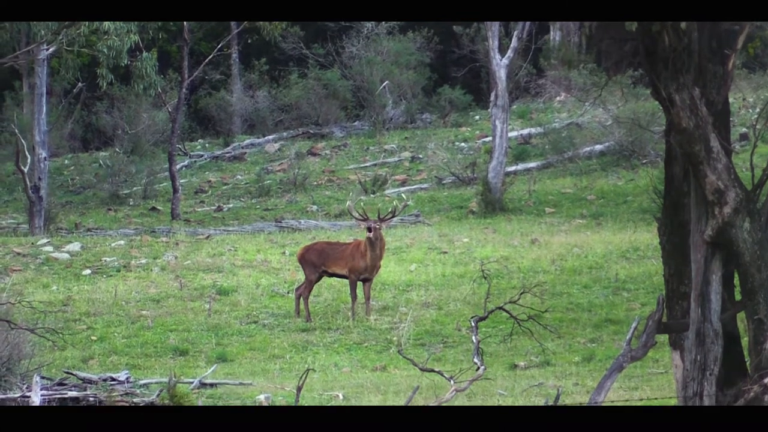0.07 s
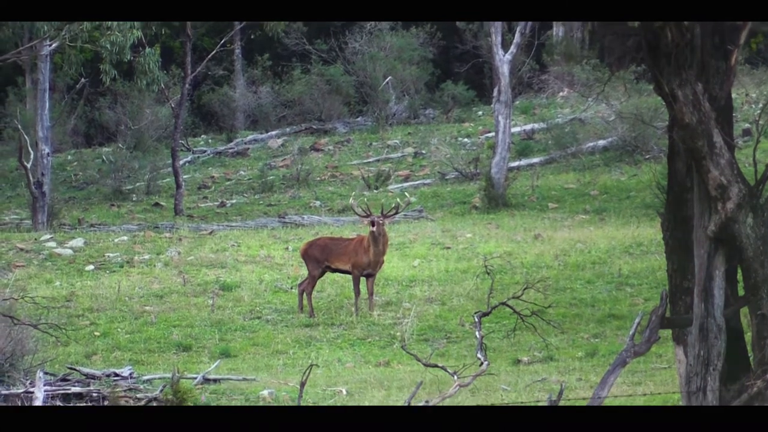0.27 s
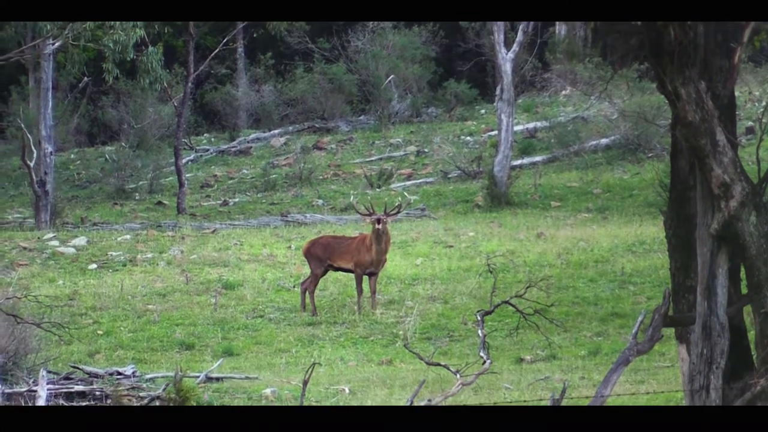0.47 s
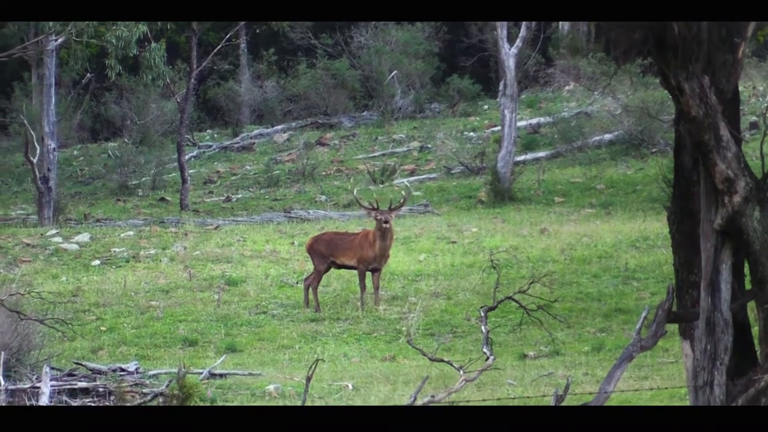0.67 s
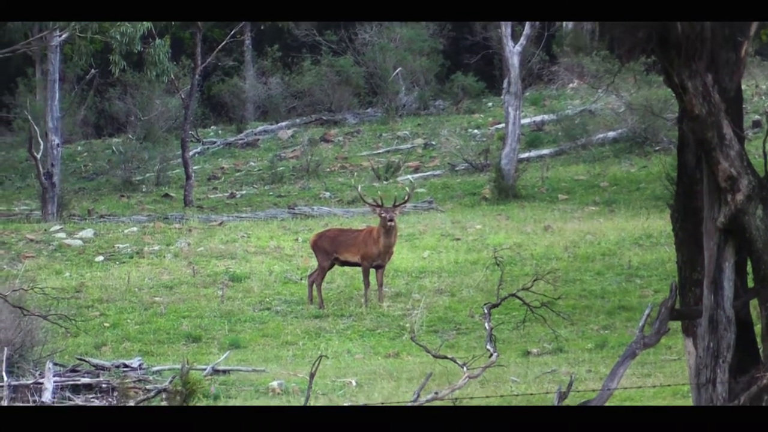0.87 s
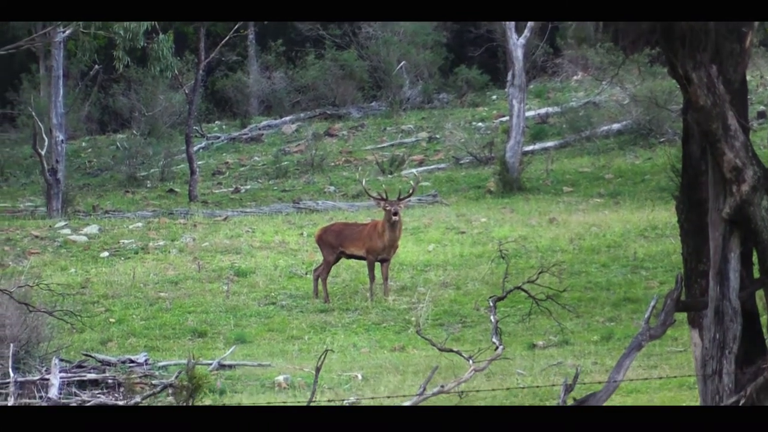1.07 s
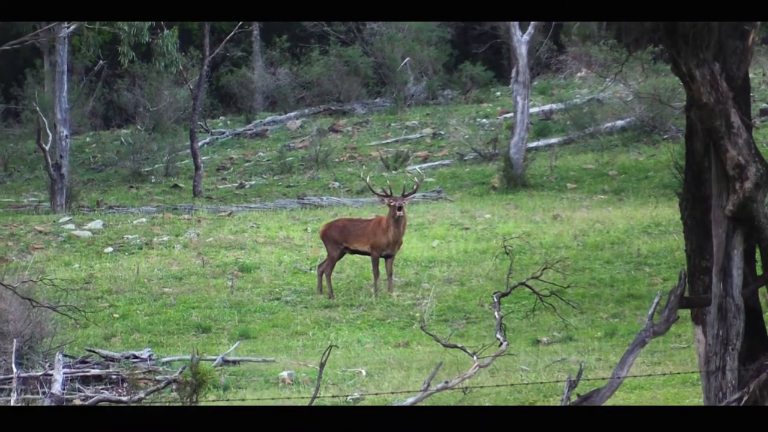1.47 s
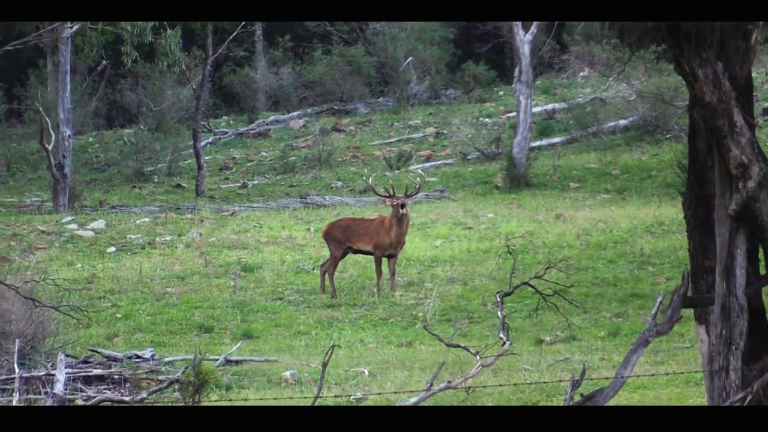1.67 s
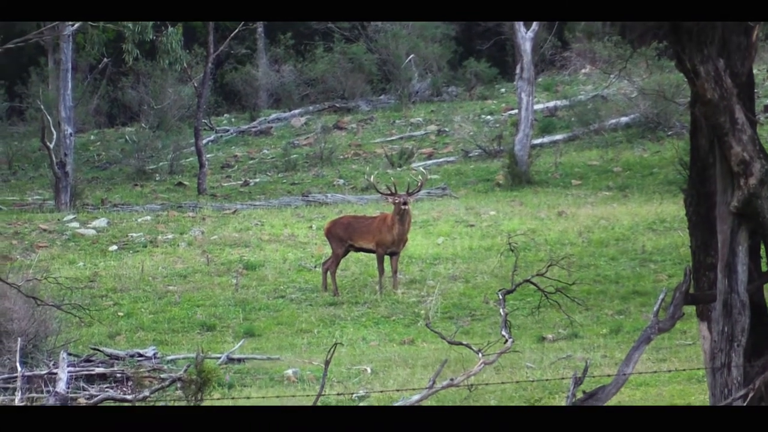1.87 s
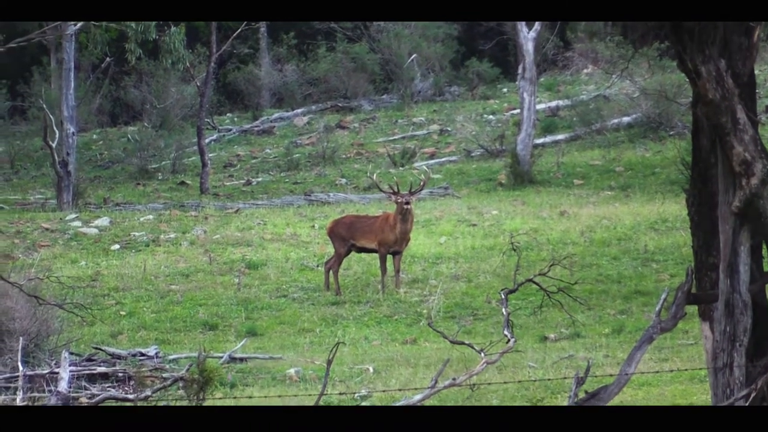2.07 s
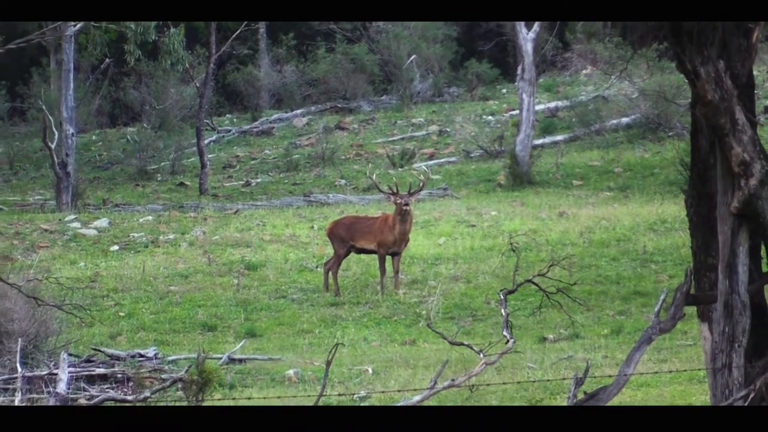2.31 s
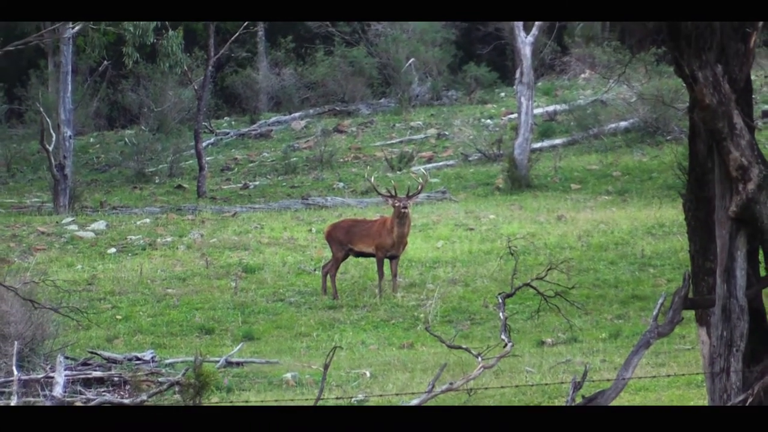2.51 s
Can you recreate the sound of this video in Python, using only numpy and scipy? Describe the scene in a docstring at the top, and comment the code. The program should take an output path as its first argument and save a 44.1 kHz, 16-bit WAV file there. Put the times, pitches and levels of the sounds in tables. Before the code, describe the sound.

A male deer roars twice, loud and harsh, over quiet forest background noise.

```python
"""A red stag roars in a clearing

Each of his two roars climbs from a low rattle to a held, buzzing note, then breaks into harsh,
uneven slaps of the vocal folds, all ringing through the changing shape of his throat.
A faint hiss goes with each roar, and the trees send back a short echo.
Small birds chirp over the soft rush of the forest."""
import sys
import numpy as np
from scipy import signal
from scipy.fft import rfft, irfft, next_fast_len
from scipy.io import wavfile
from scipy.ndimage import uniform_filter1d

SR = 44100
rng = np.random.default_rng(int(sys.argv[2]) if len(sys.argv) > 2 else 0)


def bounce(signal):
    """Save signal as a 16-bit WAV file at the path given by the first command-line argument."""
    frames = np.transpose(np.atleast_2d(signal))
    limited = np.clip(frames, -1, 1)
    pcm = np.round(limited * 32767).astype(np.int16)
    wavfile.write(sys.argv[1], SR, pcm)


N = 116865


def amp(db):
    """Turn decibels into a number to multiply by."""
    return 10 ** (np.asarray(db) / 20)


def unit(x):
    """Scale a signal to an average strength (rms) of 1."""
    return x / np.sqrt(np.mean(x ** 2) + 1e-20)


def level_at(points, hz):
    """Read the level at hz from (frequency, level) points joined on a log frequency axis."""
    point_hz, level_db = np.transpose(points)
    return np.interp(np.log(hz + 1), np.log(point_hz + 1), level_db)


def clock():
    """The time of each sample in seconds."""
    return np.arange(N) / SR


def curves(rows):
    """Join rows of (time, values...) with straight lines, giving one curve per value column."""
    time_s, *columns = np.transpose(rows)
    return [np.interp(clock(), time_s, column) for column in columns]


def window(start_s, end_s, fade_s):
    """1 between two times and 0 outside, with straight fades."""
    return np.clip(np.minimum(clock() - start_s, end_s - clock()) / fade_s + .5, 0, 1)


def wobble(samples=1000):
    """A random curve of strength 1 that changes over about this many samples."""
    return unit(uniform_filter1d(rng.standard_normal(N), samples))


def filtered(x, gain, causal=False):
    """Scale each frequency by gain(hz); a causal filter rings only after the sound goes in."""
    size = 2 * next_fast_len(N // 2 + 2048, True)
    response = gain(np.fft.rfftfreq(size, 1 / SR))
    if causal:  # same gains, with the least possible delay (minimum phase)
        cepstrum = irfft(np.log(response + 1e-9))
        response = np.exp(rfft(2 * cepstrum[:size // 2], size) - cepstrum[0])
    return irfft(rfft(x, size) * response, size)[:N]


def noise(spectrum):
    """Noise of strength 1, with its balance of bass and treble set by spectrum."""
    return unit(filtered(rng.standard_normal(N), lambda hz: amp(level_at(spectrum, hz))))


def steady(x, samples=1800):
    """Even out slow changes of loudness while keeping the single pulses."""
    power = uniform_filter1d(uniform_filter1d(x ** 2, samples), samples)
    return x / np.sqrt(np.abs(power) + 1e-4 * np.mean(x ** 2))


def pulses(times_s, sizes):
    """Sharp clicks, each spread over 16 samples so that it can fall between two of them."""
    centres = np.asarray(times_s)[:, None] * SR
    taps = np.floor(centres).astype(int) + np.arange(-7, 9)
    shape = np.sinc(taps - centres) * np.cos((taps - centres) * np.pi / 16) ** 2
    clicks = shape * sizes[:, None]
    return np.bincount(np.clip(taps, 0, N).ravel(), clicks.ravel(), N + 1)[:N]


def reflections(samples, fade_s):
    """Many tiny echoes: noise that dies away by 60 dB in fade_s."""
    t = np.arange(samples) / SR
    tail = rng.standard_normal(samples) * np.exp(-np.log(1000) * t / fade_s)
    return tail / np.linalg.norm(tail)


def echo(x, fade_s):
    """The sound as it bounces back from the ground and the trees."""
    return signal.fftconvolve(x, reflections(SR // 2, fade_s))[:N]


def scatter(x):
    """Reflections from the nearby slope smear each pulse in time without changing its tone."""
    path = amp(-2) * reflections(SR // 4, fade_s=0.093)
    path[0] += 1  # the sound that arrives directly
    size = 2 * next_fast_len(N)
    phase = np.angle(rfft(path, size))
    return irfft(rfft(x, size) * np.exp(1j * phase), size)[:N]


def forest():
    """The soft, steady rush of the forest."""
    # Tone of the rush: frequency_hz, relative_level_db
    rush_spectrum = [(20, -37), (110, -22), (250, -13.5), (331, -9), (480, -1), (582, -4.5), (1050, -7.5),
                     (1900, -12), (7500, -27.5), (15500, -30)]
    return amp(-42.5) * noise(rush_spectrum)


def birds(waver_hz=130):
    """Short, wavering whistles from the forest edge, most sliding up or down, and their echo."""
    # One chirp a row: start_s, length_s, from_hz, to_hz, level_db
    chirps = [(0.224, 0.043, 5210, 7000, -45), (0.234, 0.036, 3100, 3420, -41),
              (0.264, 0.044, 4780, 4780, -48), (1.48, 0.058, 3565, 4150, -50.5),
              (2.283, 0.047, 5050, 6465, -47), (2.314, 0.033, 4780, 4420, -46)]
    song = np.zeros(N)
    waver = waver_hz * wobble(samples=60)
    for start_s, length_s, from_hz, to_hz, level_db in chirps:
        progress = np.clip((clock() - start_s) / length_s, 0, 1)
        pitch_hz = from_hz + (to_hz - from_hz) * progress + waver
        whistle = np.sin(2 * np.pi * np.cumsum(pitch_hz) / SR)
        song += amp(level_db) * np.sin(np.pi * progress) * whistle
    return song + amp(2) * echo(song, fade_s=0.26)


def hiss():
    """A broad, faint hiss that goes with each roar."""
    # When the stag roars: start_s, end_s
    roar_times = [(0.154, 1.08), (1.587, 2.405)]
    # Tone of the hiss: frequency_hz, relative_level_db
    hiss_spectrum = [(120, -8), (500, 16.5), (3500, 2.5), (13000, -11)]
    roaring = sum(window(start_s, end_s, fade_s=0.029) for start_s, end_s in roar_times)
    return amp(-42) * noise(hiss_spectrum) * roaring


def vocal_folds(pitch_points, roughness_points, broken_hz, cycles=900):
    """Each flap of the folds makes a pulse and a puff of air; roughness makes the flaps uneven."""
    # Hard slaps of the folds as the roars die: time_s, level_db (above a smooth pulse)
    slaps = [(.6743, 6), (.7287, 6), (.9402, 6), (.9736, 7), (2.0882, 6), (2.1232, 6), (2.1356, 9),
             (2.1965, 8), (2.2234, 7), (2.2703, 12), (2.2913, 9), (2.3791, 8)]
    jitter_cycles, size_spread_db, air_share = 0.2964, 3.5, 0.51  # at full roughness
    sag_s, puff_decay_s, tremble_share = 0.1, 0.0026, 0.0015
    t = clock()
    pitch_hz = curves(pitch_points)[0]
    roughness = np.clip(curves(roughness_points)[0], 0, 1)
    # After its last pitch point the voice breaks and sags towards broken_hz.
    since_break_s = np.maximum(t - pitch_points[-1][0], 0)
    pitch_hz = broken_hz + (pitch_hz - broken_hz) * np.exp(-since_break_s / sag_s)
    pitch_hz *= 1 + tremble_share * wobble()
    # One flap per cycle; spare cycles land past the end of the sound.
    flap_s = np.interp(np.arange(cycles), np.cumsum(pitch_hz) / SR, t, right=2 * N / SR)
    flap_roughness = np.interp(flap_s, t, roughness)
    timing_luck, size_luck = rng.standard_normal((cycles, 2)).T
    flap_s += jitter_cycles * flap_roughness * timing_luck / np.interp(flap_s, t, pitch_hz)
    flap_db = size_spread_db * flap_roughness * (np.minimum(size_luck, 1.5) + 0.5)
    buzz = pulses(flap_s, amp(flap_db))
    for time_s, level_db in slaps:
        buzz += pulses([time_s], amp([level_db]))
    # Swirling air adds a quickly fading puff of noise after each pulse.
    decay = np.exp(-1 / (puff_decay_s * SR))
    puffs = np.sqrt(np.abs(signal.lfilter([1 - decay], [1, -decay], buzz ** 2)))
    return buzz + air_share * np.sqrt(roughness) * puffs * rng.standard_normal(N)


def throat(buzz, resonances, low_cut_hz=336):
    """The throat rings at a few frequencies, its resonances; the mouth lets little bass out."""
    # What the throat's tissue passes between the resonances: frequency_hz, level_db
    tissue = [(100, -33), (300, -30), (1000, -43), (3200, -32), (3800, -27.5), (5000, -49), (7000, -42),
              (12000, -71)]

    def gain(hz):
        peak_power = sum(amp(2 * level_db) / (1 + (1.796 * (hz - centre_hz) / width_hz) ** 2) ** 2
                         for centre_hz, width_hz, level_db in resonances)
        tissue_power = amp(2 * level_at(tissue, hz))
        bass_cut = 1 + (low_cut_hz / (hz + 20)) ** 6
        return np.sqrt((peak_power + tissue_power) / bass_cut)
    return filtered(buzz, gain, causal=True)


def roar(buzz, shapes, timing, loudness, steps=5):
    """The buzz rings through one throat shape after another; its lows and highs swell and fade."""
    blend_s, split_hz, flutter_db = 0.032, 1480, 0.4
    first_s, last_s = loudness[0][0], loudness[-1][0]
    ends_s = [start_s for start_s, _ in timing[1:]] + [last_s + blend_s]
    voice = np.zeros(N)
    for resonances, (start_s, sink_share), end_s in zip(shapes, timing, ends_s):
        # As the neck stretches the resonances sink in small steps, the highest ones most.
        edges_s = np.linspace(start_s, end_s, steps + 1)
        shifts = np.linspace(sink_share / 2, -sink_share / 2, steps)
        for from_s, to_s, shift in zip(edges_s, edges_s[1:], shifts):
            moved = [(hz * (1 + shift * (hz / 3000) ** 3), width, db) for hz, width, db in resonances]
            voice += throat(buzz * window(from_s, to_s, blend_s), moved)
    voice = scatter(voice)
    lows = filtered(voice, lambda hz: 1 / (1 + (hz / split_hz) ** 24))
    highs = voice - lows
    shaped = sum(steady(band) * amp(level_db + flutter_db * wobble())
                 for band, level_db in zip([lows, highs], curves(loudness)))
    return shaped * window(first_s, last_s, fade_s=0.03)


def stag():
    """The vocal folds drive the throat in two roars, which echo among the trees."""
    # How fast the folds flap in roars 1 and 2: time_s, pitch_hz
    pitch_1 = [(.15, 106.2), (.206, 131.2), (.286, 159), (.358, 175.6), (.406, 191.8), (.43, 193.5),
               (.468, 220.2), (.504, 215.2), (.64, 208.7)]
    pitch_2 = [(1.6, 112), (1.66, 136), (1.712, 149.6), (1.762, 156.8), (1.848, 160.6), (1.98, 154.9),
               (2.03, 162.3)]
    # How unevenly they flap: time_s, roughness (0 to 1)
    roughness_1 = [(.15, .1), (.29, .01), (.419, .02), (.446, .25), (.485, .015), (.632, .01), (.675, .25),
                   (.79, .7)]
    roughness_2 = [(1.59, .1), (1.68, .05), (1.76, .01), (1.98, .015), (2.055, .1), (2.111, .7)]
    # Resonances of each throat shape: centre_hz, width_hz, relative_level_db
    opening_1 = [(730, 420, -18.5), (1280, 87, -8), (1684, 300, -6), (2024, 207, -2.5), (2770, 280, -10),
                 (3700, 1400, -30)]
    swelling_1 = [(668, 155, -7), (1203, 170, -7.5), (1748, 85, 7), (1920, 250, -0.5), (2480, 180, -2),
                  (2880, 120, -4.5), (3300, 110, -12)]
    cracking_1 = [(665, 130, -7), (1106, 110, -1), (2060, 1100, -12), (2508, 83, 1.5)]
    peaking_1 = [(420, 216, -17), (826, 350, -17), (1244, 69, -2), (1890, 160, -3.5), (2168, 174, 0),
                 (2805, 194, 3.5), (3032, 150, -0.5)]
    harsh_1 = [(396, 86, -9), (525, 86, -4.5), (827, 57, -3), (1207, 158, 2), (2048, 197, 6),
               (2460, 99, -1), (2776, 320, 0), (3010, 420, -8)]
    opening_2 = [(735, 620, -15.5), (1237, 170, -6.5), (1630, 210, -9.5), (2006, 217, -0.5),
                 (2756, 210, -14.5), (3150, 120, -16), (3520, 280, -21)]
    holding_2 = [(765, 180, -5), (1121, 50, 5), (1247, 110, -0.5), (1676, 240, -3.5), (2087, 112, 1.5),
                 (2550, 140, -7), (3100, 590, -22.5)]
    harsh_2 = [(427, 80, -5), (564, 43, -1.5), (980, 560, -8), (1247, 57, 5.5), (1581, 34, -6),
               (2020, 310, -9.5), (2474, 130, -6), (2840, 215, -4), (3050, 160, -3.5)]
    # When each shape begins and how far a resonance at 3000 Hz sinks in it: start_s, sink_share
    timing_1 = [(.14, 0.15), (.355, .01), (0.435, .02), (0.473, 0.058), (0.662, 0.042)]
    timing_2 = [(1.54, 0.065), (1.75, 0.028), (1.997, 0.006)]
    # Loudness of the low and high parts of the voice: time_s, low_level_db, high_level_db
    loudness_1 = [(.14, -59, -47), (.211, -42, -30), (.34, -35, -27.5), (.422, -29.5, -22.5),
                  (.47, -37.5, -27), (0.634, -23.5, -19.5), (0.648, -28.5, -28), (.73, -30, -26),
                  (.84, -31, -32), (1.041, -30, -36.5), (1.075, -42.5, -41), (1.149, -41, -44.5)]
    loudness_2 = [(1.565, -62, -49.5), (1.62, -40, -28), (1.76, -32, -29.5), (1.86, -34, -30.5),
                  (1.925, -31.5, -31.5), (2.035, -32.5, -26), (2.095, -34, -31), (2.137, -36, -30),
                  (2.155, -34, -34), (2.39, -36.5, -36), (2.415, -63, -52)]
    buzz_1 = vocal_folds(pitch_1, roughness_1, broken_hz=165.54)
    roar_1 = roar(buzz_1, [opening_1, swelling_1, cracking_1, peaking_1, harsh_1], timing_1, loudness_1)
    buzz_2 = vocal_folds(pitch_2, roughness_2, broken_hz=126.6)
    roar_2 = roar(buzz_2, [opening_2, holding_2, harsh_2], timing_2, loudness_2)
    roars = roar_1 + roar_2
    return roars + amp(-6.5) * echo(roars, fade_s=0.1)


def scene():
    """The stag and the birds over the rush of the forest, in one channel."""
    return (stag() + hiss() + birds() + forest())[None]


def record(dry, dull_hz=11840, top_hz=15720):
    """The microphone dulls the highest treble, and nothing is heard above top_hz."""
    return filtered(dry[0], lambda hz: (hz < top_hz) / np.sqrt(1 + (hz / dull_hz) ** 10))[None]


dry = scene()
out = record(dry)
bounce(out)
```